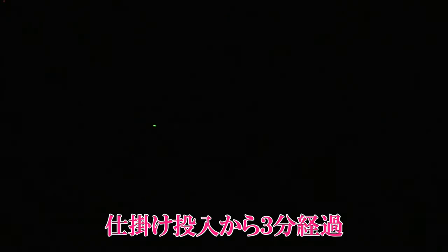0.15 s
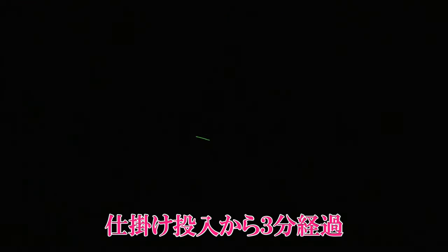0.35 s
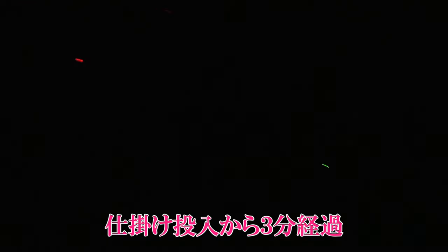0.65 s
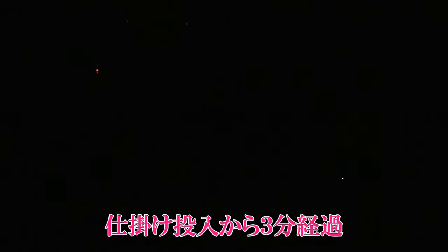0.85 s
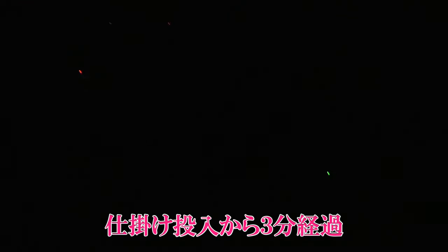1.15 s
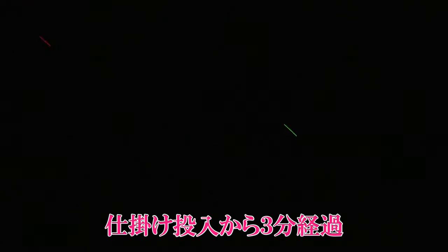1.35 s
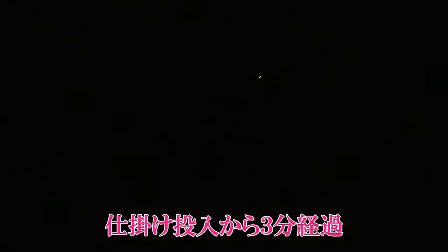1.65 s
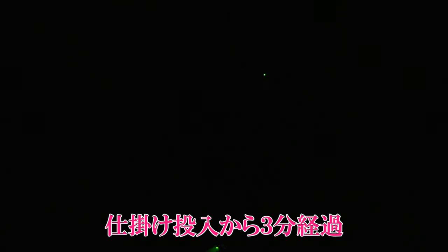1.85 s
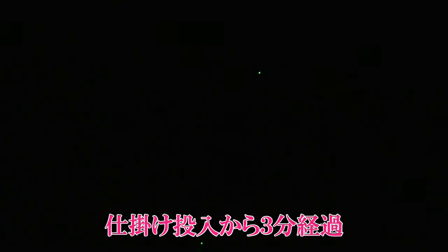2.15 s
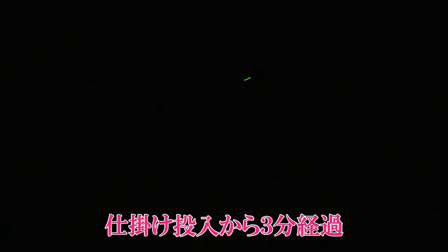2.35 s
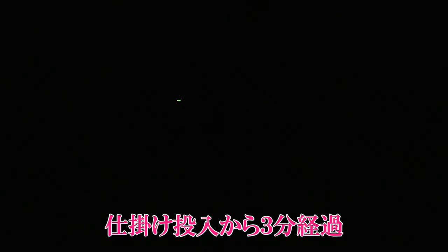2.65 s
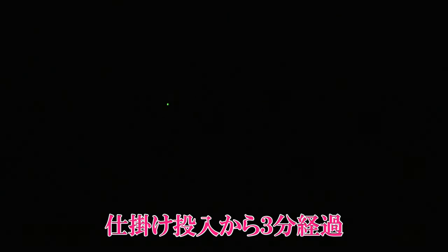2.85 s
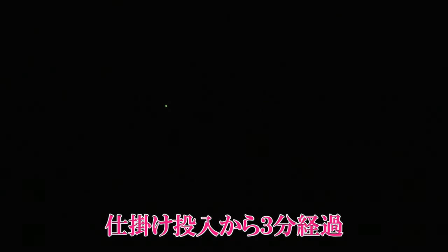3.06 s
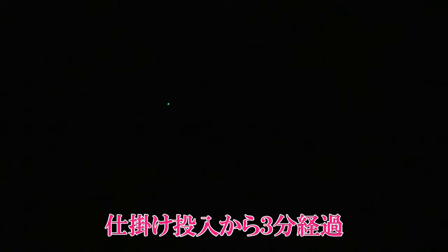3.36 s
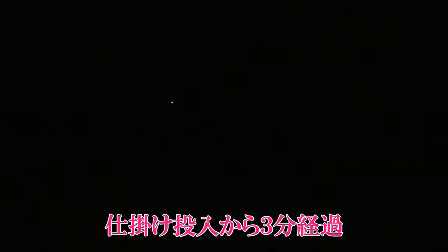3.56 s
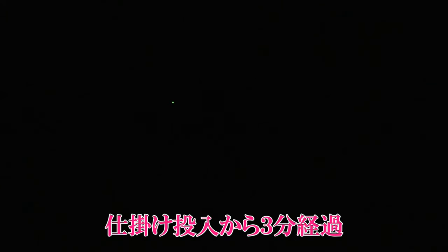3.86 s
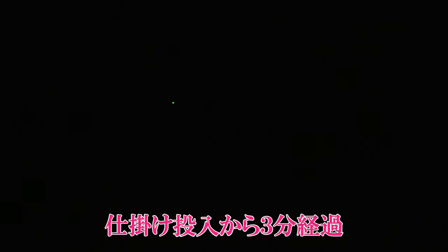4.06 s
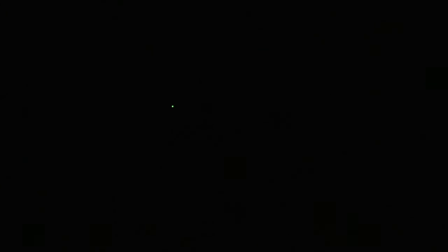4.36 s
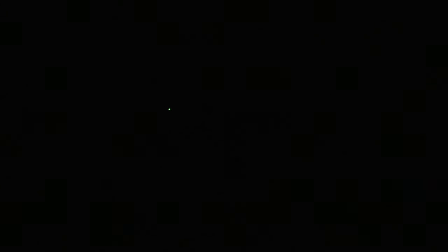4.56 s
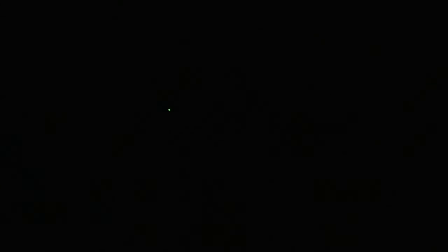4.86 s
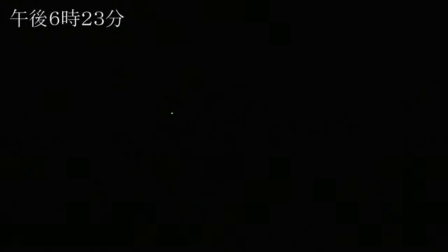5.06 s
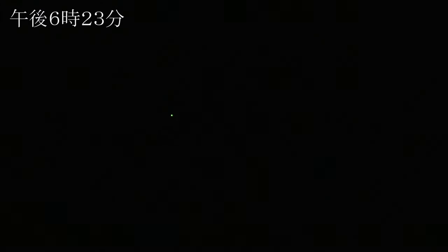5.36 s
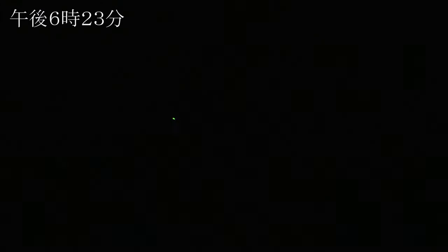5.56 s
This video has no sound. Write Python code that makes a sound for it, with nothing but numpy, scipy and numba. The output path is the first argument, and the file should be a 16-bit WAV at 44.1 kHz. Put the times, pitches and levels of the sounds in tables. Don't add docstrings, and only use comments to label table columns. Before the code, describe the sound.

At night, sea water washes over rocks, heard through a small sealed waterproof housing that muffles bass and treble. A bubbly rush opens, with a click and a burst of plops and gurgles, eases to a calm near three seconds, fizzes briefly, then a wave breaks with large overlapping bubbles and subsides. Thin electronic hiss continues throughout.

```python
import sys
import numpy as np
from scipy import signal
from scipy.fft import rfft, irfft, next_fast_len
from scipy.io import wavfile
from scipy.ndimage import uniform_filter1d
from numba import njit

SR = 44100
rng = np.random.default_rng(int(sys.argv[2]) if len(sys.argv) > 2 else 0)


def nominal_scale(level):
    x = np.asarray(level, float) / 20
    return 10 ** x


def file_out(sig):
    cols = np.atleast_2d(sig).T
    lim = np.clip(cols, -1, 1)
    pcm = np.round(lim * 32767).astype(np.int16)
    wavfile.write(sys.argv[1], SR, pcm)


N = 251811
STEP = 64

# frequency in Hz, then the shares (about 0 to 1.3, or
LAYERS = [
    (500, 1, -0.73, 0.98, 0.063),
    (1110, 0.96, -0.25, 0.45, .05),
    (2400, 0.71, 0.53, 1.31, .05),
    (8500, 0.87, -0.61, 1.16, 1.1),
]
# frequency in Hz, gain in dB.
HOUSING_PORT = [(4300, -42.5), (4560, -49.5), (4800, -43.5), (5300, -44.5), (5540, -54), (5690, -62),
                (5830, -52), (6100, -42.5), (6800, -35.5), (7800, -41), (8800, -37), (10100, -28.5),
                (11000, -35.5), (12600, -44), (16500, -39)]


def on_log(table, hz):
    f, db = np.transpose(table)
    return np.interp(np.log(np.maximum(hz, 1)), np.log(f), db)


def colour(x, table):
    size = 4096
    hz = np.arange(size // 2 + 1) * SR / size
    cepstrum = irfft(np.log(nominal_scale(on_log(table, hz))))
    cepstrum[1:size // 2] *= 2
    cepstrum[size // 2 + 1:] = 0
    response = irfft(np.exp(rfft(cepstrum)))[:size // 2]
    return signal.fftconvolve(x, response)[:N]


def level(x, db):
    return x * nominal_scale(db) / np.sqrt(np.mean(x ** 2))


def walk(rate):
    hold, count = int(SR / STEP / rate), N // STEP + 1
    held = np.repeat(rng.standard_normal(count // hold + 1), hold)
    return 0.88 * uniform_filter1d(uniform_filter1d(held, hold), hold)[:count]


@njit
def ring(at, hz, t60, rise, swell, size):
    out = np.zeros(N)
    for k in range(len(at)):
        start, length = int(at[k] * SR), int(t60[k] * SR)
        phasor = size[k] + 0j
        advance = np.exp(2j * np.pi * hz[k] / SR - np.log(1000) / length)
        climb = np.exp(2j * np.pi * hz[k] * rise[k] / SR / length)
        onset, grow = 0., 1 / (1 + swell[k] * SR)
        for i in range(max(start, 0), min(start + length, N)):
            onset += (1 - onset) * grow
            out[i] += onset * phasor.imag
            phasor *= advance
            advance *= climb
    return out


def wash():
    bubble_count = 40000
    u = rng.random((bubble_count, 5)).T
    hz = 250 * (16000 / 250) ** u[1]
    cycles = 5.2 + 16 * u[2] ** 2
    spread_db = np.minimum(2.34 * -np.log(1 - u[3]), 13)
    size = nominal_scale(spread_db) * hz / np.sqrt(cycles)
    bubbles = ring(u[0] * N / SR, hz, cycles / hz, 0.045 * u[4], 0.44 / hz, size)
    foam = rng.standard_normal(N)
    fft_size = next_fast_len(N)
    water = rfft(level(bubbles, -3.5) + level(foam, -3.5), fft_size)
    octave = np.log2(np.maximum(np.arange(len(water)) * SR / fft_size, 20))

    t = np.arange(N // STEP + 1) * STEP
    sea_db = sea_state(t / SR)
    out, surge, shared = 0, walk(45), walk(15)
    for centre in np.arange(4, 14.6, .5):
        band = np.cos(np.pi * np.clip(octave - centre, -.5, .5)) ** 2
        layer = irfft(water * band)[:N]
        place = np.interp(centre, np.log2(np.transpose(LAYERS)[0]), range(4))
        k = min(int(place), 2)
        db = sea_db[k] + (place - k) * (sea_db[k + 1] - sea_db[k])
        shared = np.sqrt(.6) * shared + np.sqrt(.4) * walk(16)
        db = db + surge + 0.76 * shared + 0.69 * walk(40)
        depth = np.clip((centre - 5.5) / 2.5, .3, 1)
        depth *= 1 + 0.95 * np.exp(-((centre - 12.3) / 0.21) ** 2)
        out = out + layer * np.interp(np.arange(N), t, nominal_scale(depth * db))
    return out


def sea_state(s):
    # time in seconds, swell in dB, froth in dB over the swell, spray in dB over the swell.
    sea = [
        (0.0, -30.5, 3.5, 1.8),
        (0.27, -31, 1.9, 1.6),
        (1.0, -34.5, -0.3, 0.3),
        (1.48, -33.5, -0.5, 0.5),
        (1.92, -36, -1.2, -0.7),
        (2.96, -39.5, 1.7, 0.8),
        (3.51, -33, 3.5, 0.9),
        (3.9, -34, 3.9, -0.5),
        (4.71, -29.5, 0, 0.2),
        (5.71, -34.5, 0.4, -3.2),
    ]
    # peak time in seconds, lift in dB, length in seconds, extra froth in dB.
    slap_events = [(.15, -1.5, 0.15, -2), (0.38, 1.5, 0.11, -1), (0.587, 1, 0.24, 1),
                   (0.668, 0.3, 0.034, -2), (0.76, 2.5, 0.067, 1.5), (1.3, 0, 0.11, 1), (1.495, 1, .1, -1),
                   (2.15, 1, 0.17, .6), (2.66, 0, 0.033, 5), (2.73, 2, 0.13, 1), (2.856, -2, 0.055, 2),
                   (3.003, 2, 0.18, 1), (3.43, 0, 0.14, 0.5), (3.603, 1, 0.11, -0.5),
                   (3.975, 2, 0.15, -3.5), (4.272, 3.5, 0.073, 1), (4.45, 5, 0.0088, 8),
                   (4.525, 6, 0.12, 2), (4.727, -3, 0.058, 1), (4.854, 4.5, 0.17, 2.5),
                   (5.02, 2.5, 0.088, 0), (5.063, 1.5, 0.02, 0), (5.146, 6.5, 0.06, 1),
                   (5.27, 1, 0.087, -2), (5.45, 3, .1, -1)]
    rise_share = 0.95
    at, swell_db, froth_db, spray_db = np.transpose(sea)
    swell, froth, mist = (np.interp(s, at, db - np.mean(db)) for db in (swell_db, froth_db, spray_db))
    peak, lift_db, length, extra_db = np.transpose(slap_events)[:, :, None]
    width = length * np.where(s < peak, rise_share, 1)
    shape = np.exp(-(2 * (s - peak) / width) ** 2)
    slaps = np.sum(lift_db * shape, axis=0)
    froth = froth + np.sum(extra_db * shape, axis=0)
    return [a * swell + b * froth + c * slaps + d * mist for _, a, b, c, d in LAYERS]


def plops():
    # start in seconds, peak in dB, pitch in Hz, 60 dB decay time in seconds.
    calm = [(.573, -28, 730, .025), (.619, -16.5, 890, 0.016), (0.815, -22.5, 1790, 0.04),
            (.8785, -19.5, 3220, 0.005), (1.399, -5.5, 1175, 0.016), (1.464, -16, 990, 0.025),
            (1.47, -15.5, 950, 0.052), (1.484, -29, 1050, .022), (1.488, -21, 830, 0.033),
            (1.491, -8, 1355, 0.027), (1.5, -14, 1360, 0.031), (1.506, -7, 980, .018),
            (1.465, -17, 1490, .03), (1.522, -18, 1080, 0.016), (1.534, -24, 1050, .018),
            (2.435, -22, 1090, .03), (2.552, -20, 1970, 0.009), (2.656, -23, 2570, 0.0091),
            (2.679, -20, 1460, 0.022), (2.745, -24.5, 1445, 0.053), (2.984, -26, 966, .03)]
    # start in seconds, peak in dB, pitch in Hz, 60 dB decay time in seconds.
    breaking = [(4.449, -30, 1670, 0.013), (4.493, -11.5, 2400, .012), (4.498, -15, 1400, .025),
                (4.538, -13.5, 1730, .026), (4.547, -19, 1170, .025), (4.646, -12.5, 1940, .022),
                (4.649, -11, 920, 0.03), (4.645, -14, 537, .083), (4.664, -15, 1410, 0.041),
                (4.799, -13, 1940, 0.026), (4.834, -13, 850, 0.019), (4.836, -18, 1400, .015),
                (4.853, -16, 1740, .02), (4.88, -16, 2660, 0.016), (4.904, -13, 1460, 0.016),
                (5.132, -22, 1250, .047), (5.144, -14, 540, 0.032), (5.162, -16.5, 538, 0.055),
                (5.345, -17, 1240, 0.035), (5.271, -18, 875, 0.039)]
    at, db, hz, t60 = np.transpose(calm + breaking)
    swell_share = np.where(at < breaking[0][0], 0.07, 0.099)
    pitch_climb = 0.061 + 0 * at
    return ring(at, hz, t60, pitch_climb, swell_share * t60, nominal_scale(db))


def gurgles():
    # start in seconds, length in seconds, level in dB, middle pitch in Hz, spread in octaves.
    swarms = [
        (1.404, .09, -33.5, 1034, 0.37),
        (1.46, .08, -26.5, 1270, 0.89),
        (4.638, .02, -29, 1400, 1.07),
        (5.125, .06, -51, 1290, 1.5),
        (2.97, .021, -40, 1025, 0.59),
        (4.797, .125, -32, 1900, 0.68),
    ]
    peak_share = 0.26
    out = 0
    for start, length, db, middle_hz, octaves in swarms:
        u = rng.random((60, 3)).T
        at = start + length * u[0]
        hz = middle_hz * 2 ** (octaves * (u[1] - .5))
        density = np.interp(u[0], (0, peak_share, 1), (.3, 1, .15))
        size = nominal_scale(db + 12.0 * u[2]) * density
        out = out + ring(at, hz, 26 / hz, 0.088 + 0 * at, 1.9 / hz, size)
    return out


def clicks():
    # start in seconds, peak in dB, pitch in Hz, 60 dB decay time in seconds, pitch rise per ring.
    dry_clicks = [(0.6652, -19.5, 1300, 0.0052, -0.14), (0.667, -17, 1200, 0.011, -0.17),
                  (2.0132, -30, 3600, 0.0034, -0.23), (2.3698, -12, 1490, 0.0031, -1.6),
                  (2.3703, -21, 860, 0.0058, 0.18), (2.91, -24, 2300, 0.0039, -0.29),
                  (3.319, -16.5, 1220, 0.004, -0.74), (3.354, -28, 2820, 0.0045, 0.31),
                  (3.414, -24, 1800, .005, 0.066), (4.6435, -15, 1310, 0.013, 0.39),
                  (5.058, -26, 2900, 0.006, 0.33), (4.296, -21, 2500, 0.0039, 0.05),
                  (4.733, -15, 1500, 0.004, 0), (4.682, -25, 1500, 0.0046, 0)]
    at, db, hz, t60, rise = np.transpose(dry_clicks)
    return ring(at, hz, t60, rise, 0.31 / hz, 2.0 * nominal_scale(db))


def through_housing(x):
    x = signal.sosfilt(signal.cheby2(8, 45, 4400, fs=SR, output="sos"), x)
    return signal.sosfilt(signal.butter(4, 340, "high", fs=SR, output="sos"), x)


def knocks():
    # start in seconds, peak in dB, pitch in Hz, 60 dB decay time in seconds.
    hollows = [
        (0.663, -42, 218, 0.055),
        (1.398, -41.5, 303, 0.058),
        (1.45, -38, 264, 0.034),
        (2.163, -43.5, 299, 0.061),
        (2.283, -46, 260, 0.064),
        (2.437, -37, 250, 0.029),
    ]
    at, db, hz, t60 = np.transpose(hollows)
    return ring(at, hz, t60, 0 * at, 1.0 / hz, 1.3 * nominal_scale(db))


def treble_port():
    middle = [(hz, db - HOUSING_PORT[-4][1]) for hz, db in HOUSING_PORT[4:-2]]
    return [(4000, -40), (5100, -28)] + middle + [(12600, -21), (16000, -6)]


def spray():
    # start in seconds, peak in dB, brightness from -1 to 1.
    drops = [(.158, -51, -0.59), (.6655, -48, -.7), (.9298, -50, 0.05), (1.5234, -51, 0.05),
             (2.177, -41.5, -.2), (2.6404, -59, 0.05), (2.656, -55, -.8), (2.75, -59, -.9),
             (3.593, -42, .7), (3.6017, -55, 0.05), (3.8995, -50, 0.05), (4.591, -43.5, 0.05),
             (5.0085, -50, 0.05), (5.1402, -45, -0.38), (5.5293, -49, 0.23)]
    size, t60 = 2000, 0.012
    decay = np.exp(-np.log(1000) * np.arange(size) / SR / t60)
    out = np.zeros(N + size)
    for at, db, bright in drops:
        i = int(at * SR)
        crack = signal.lfilter([1, -bright], 1, rng.standard_normal(size))
        out[i:i + size] += nominal_scale(db) * crack * decay
    return nominal_scale(12.0) * colour(out[:N], treble_port())


def sizzle():
    # start in seconds, end in seconds.
    sizzle_s = (3.598, 3.672)
    start, end = sizzle_s
    points = (start - .002, start, start + .03, end - .01, end)
    gate = np.interp(np.arange(N) / SR, points, (0, 1, .6, 1, 0))
    crackle = np.repeat(nominal_scale(4.3 * rng.standard_normal(N // STEP + 1)), STEP)[:N]
    steep_port = [(hz, 2.3 * db) for hz, db in treble_port()]
    foam = colour(rng.standard_normal(N) * crackle, steep_port)
    return gate * level(foam, -52.5)


def preamp_hiss():
    # frequency in Hz, gain in dB.
    hiss_colour = [(25, 7), (150, -8.5), (400, -13), (6000, -46), (9000, -24), (12600, -9), (15200, 3),
                   (20000, -8)]
    return level(colour(rng.standard_normal(N), hiss_colour), -65)


def supply_buzz():
    t = np.arange(N) / SR
    ripple_hz = 119.78
    partials = [np.sin(2 * np.pi * (k * ripple_hz * t + rng.random())) for k in range(118, 128)]
    return nominal_scale(-98) * sum(partials)


def scene():
    # frequency in Hz, gain in dB.
    housing_body = [(15, -64), (25, -34.5), (143, -25.5), (258, -21), (333, -12), (468, -4.5), (532, -3),
                    (579, -2), (905, 0), (1380, 0), (2730, -7.5), (3380, -16), (4000, -32.5), (5200, -49),
                    (8800, -120)]
    rush = level(colour(wash(), housing_body[1:-2] + HOUSING_PORT), -33)
    bubbles = through_housing(plops() + gurgles() + clicks())
    return (rush + bubbles + knocks() + spray() + sizzle())[None]


def roll_off(x):
    return signal.sosfilt(signal.butter(12, 17080, fs=SR, output="sos"), x)


def record(dry):
    top = signal.ellip(12, .3, 60, 15790, fs=SR, output="sos")
    mix = signal.sosfilt(top, dry + preamp_hiss() + supply_buzz())
    return roll_off(mix)


dry = scene()
out = record(dry)
file_out(out)
```